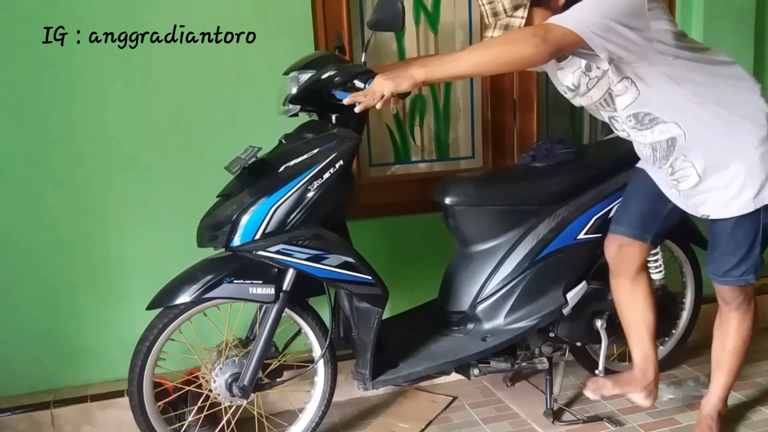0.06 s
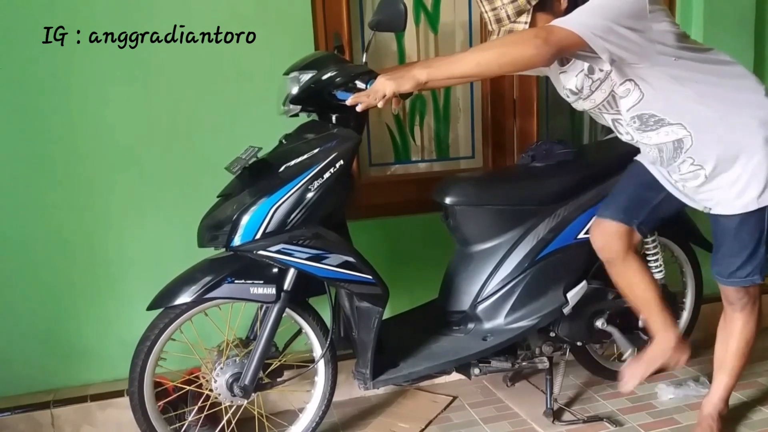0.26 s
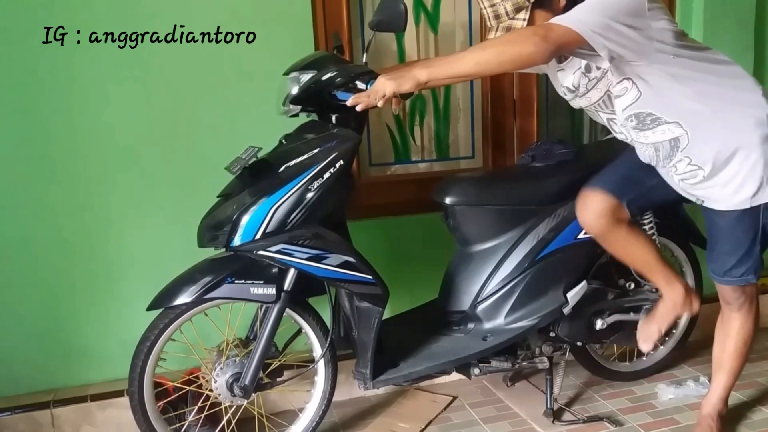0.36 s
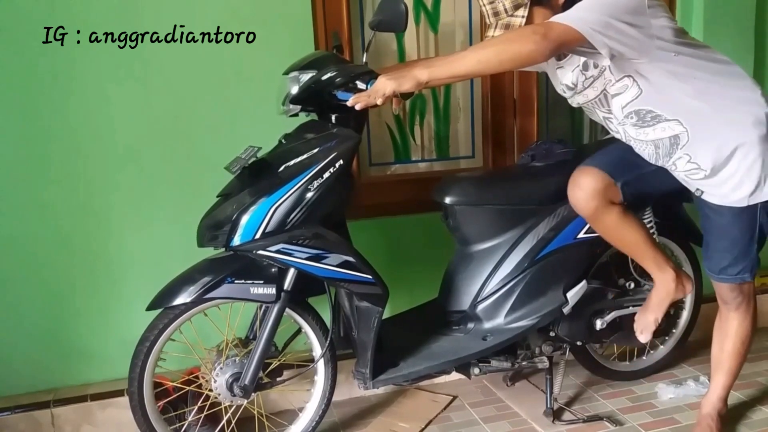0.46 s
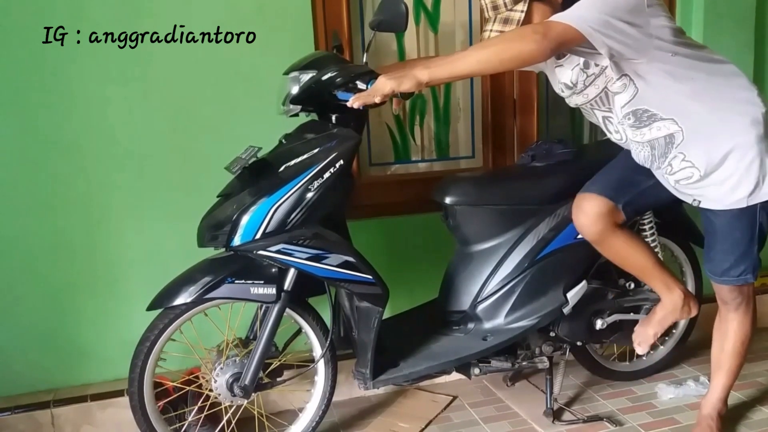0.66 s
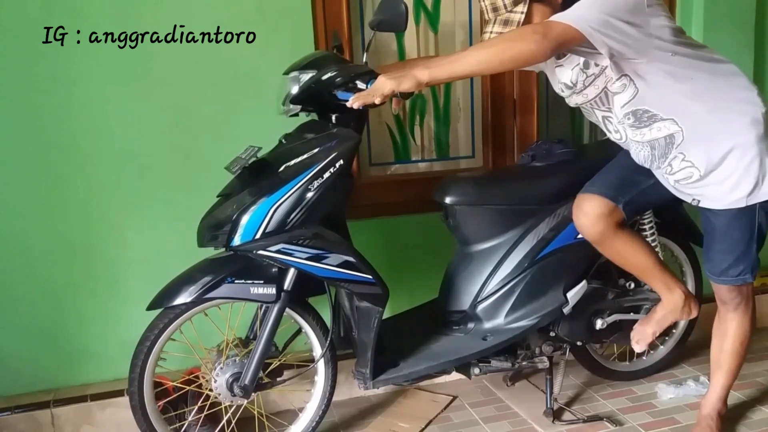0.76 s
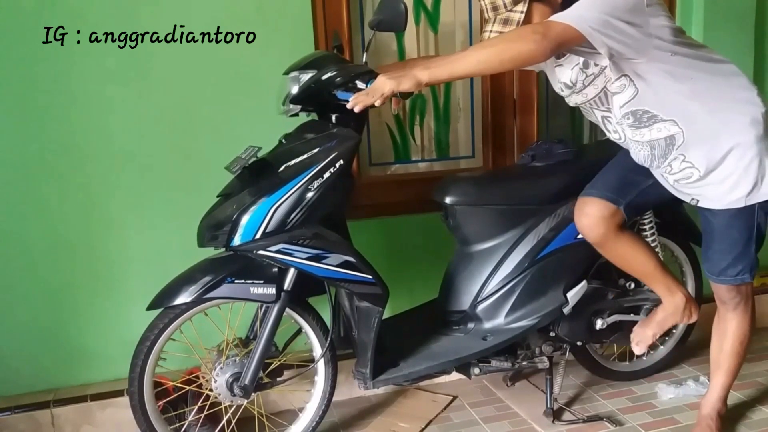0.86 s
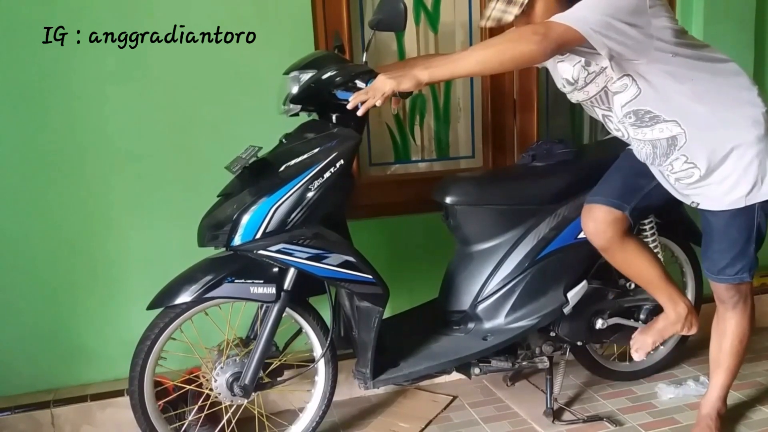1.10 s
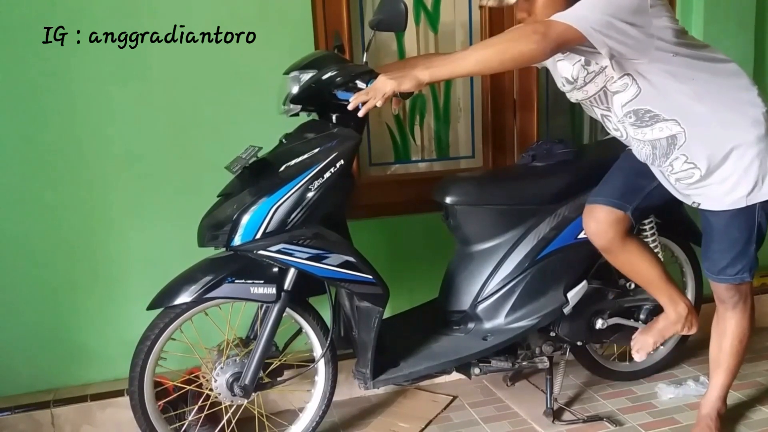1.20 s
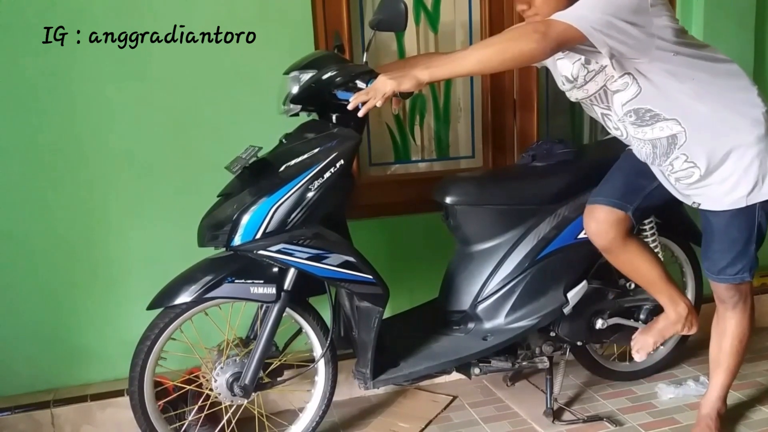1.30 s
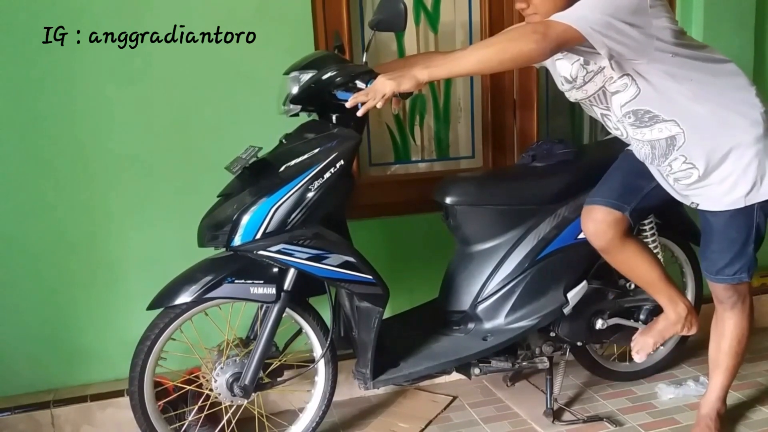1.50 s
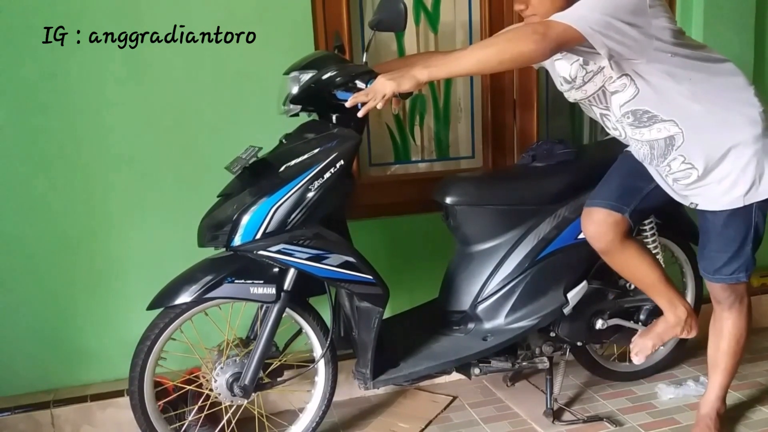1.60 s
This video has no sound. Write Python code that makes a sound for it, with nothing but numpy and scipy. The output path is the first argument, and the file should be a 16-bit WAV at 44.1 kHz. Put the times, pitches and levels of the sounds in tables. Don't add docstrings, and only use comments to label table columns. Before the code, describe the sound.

Kick-start lever clanks with low exhaust puffs and gear rattle, springs back, and settles without starting

```python
import sys
import numpy as np
from scipy import signal
from scipy.fft import rfft, irfft
from scipy.io import wavfile
from scipy.ndimage import uniform_filter1d

SR = 44100
rng = np.random.default_rng(int(sys.argv[2]) if len(sys.argv) > 2 else 0)


def to_wav(s):
    ch = np.atleast_2d(s).T
    pcm = np.round(np.clip(ch, -1, 1) * 32767)
    wavfile.write(sys.argv[1], SR, pcm.astype(np.int16))


def decibels_to_gain(level_db):
    exponent = np.asarray(level_db, float) / 20
    return 10 ** exponent


N = 72765
T = np.arange(N) / SR


def read(points, hz):
    f, value = np.transpose(points)
    return np.interp(np.log(hz + 1), np.log(f + 1), value)


def evened(x):
    return x / np.sqrt(np.mean(x ** 2) + 1e-20)


def add(mix, s, sound):
    part = mix[round(s * SR):][:len(sound)]
    part += sound[:len(part)]


def colour(x, points, tilt_db=0.):
    hz = np.abs(np.fft.fftfreq(4096, 1 / SR))
    gain_db = read(points, hz) + tilt_db * np.log2((hz + 100) / 2000)
    log_gain = np.log(decibels_to_gain(gain_db))
    taps = np.fft.ifft(np.exp(np.conj(signal.hilbert(log_gain)))).real[:2048]
    return signal.oaconvolve(x, taps / np.linalg.norm(taps))[:len(x)]


def level(curve):
    s, db = np.transpose(curve)
    return decibels_to_gain(np.interp(T, s, db, -120, -120))


def ring(hz, t60_s, rise_s, t):
    return (1 - np.exp(-t / rise_s)) * decibels_to_gain(-60 * t / t60_s) * np.sin(2 * np.pi * hz * t)


def clicks(per_s, spread_db):
    size = decibels_to_gain(spread_db * np.minimum(rng.exponential(1, N), 4)) * rng.choice([-1., 1.], N)
    return size * (rng.random(N) < per_s / SR)


def tooth_clicks():
    return clicks(2500, 3.8)


def knocks(rows, spectrum, snap_db=7, shiver_db=-9, rise_s=0.00006):
    # (frequency [Hz], level [dB], T60 [s])
    case_modes = [(1454, -6, .05), (1530, -2, .05), (1674, -4, .07), (2430, -10, .04), (2740, -7, .05),
                  (3402, -2, .025), (3709, -8, .04), (4350, -3, .02), (4662, -10, .04)]
    shiver_s, case_db = 0.017, -17
    out, t = np.zeros(N), np.arange(8192) / SR
    for s, db, tilt_db, ring_db, crack_s in rows:
        crack = rng.standard_normal(len(t)) * np.exp(-t / crack_s)
        shiver = decibels_to_gain(shiver_db) * rng.standard_normal(len(t)) * np.exp(-t / shiver_s)
        drive = (crack + shiver) * (1 - np.exp(-t / rise_s))
        drive[round(crack_s * SR / 3)] -= decibels_to_gain(snap_db)
        modes = np.zeros(len(t))
        for hz, mode_db, t60_s in case_modes:
            uneven_db = 2 * rng.standard_normal()
            mode_gain = decibels_to_gain(mode_db + uneven_db + tilt_db * np.log2(hz / 2000))
            modes += mode_gain * ring(hz, t60_s, rise_s, t)
        hit = colour(drive, spectrum, tilt_db) + decibels_to_gain(case_db + ring_db) * modes
        add(out, s, decibels_to_gain(db - 2.5) * hit)
    return out


def floor():
    # (frequency [Hz], level [dB])
    hum_hiss = [(30, -26), (60, 7), (90, 1.5), (185, 3.5), (260, -3.5), (800, -12), (3000, -27),
                (6500, -39.5), (15500, -40)]
    noise = rfft(rng.standard_normal(N)) * decibels_to_gain(read(hum_hiss, np.fft.rfftfreq(N, 1 / SR)))
    swell = evened(uniform_filter1d(rng.standard_normal(N), 3000))
    return decibels_to_gain(-61.5 + 2.5 * swell) * evened(irfft(noise, N))


def spring():
    # (time [s], frequency [Hz], level [dB], T60 [s])
    squeaks = [
        (.105, 3600, -79, 3.0),
        (.172, 3600, -60, .25),
        (1.155, 5010, -57.5, .9),
        (1.325, 4990, -71, .3),
        (1.42, 5000, -77, .25),
    ]
    out, t = np.zeros(N), T[:SR // 2]
    for s, hz, db, t60_s in squeaks:
        waver = decibels_to_gain(2.2 * evened(uniform_filter1d(rng.standard_normal(len(t)), 300)))
        add(out, s, decibels_to_gain(db) * waver * ring(hz, t60_s, .0015, t))
    return out


def sole():
    # (time [s], level [dB])
    scuff = [(.125, -81.5), (.15, -61), (.163, -52), (.176, -47), (.192, -48.5), (.225, -45.5), (.26, -41),
             (.3, -69.5)]
    # (frequency [Hz], level [dB])
    rubber = [(150, -27), (250, -5), (490, -9), (1330, -10.5), (1730, -12.5), (3010, -16.5), (3570, -14),
              (15500, -59)]
    split_hz, lag_s = 2500, 0.016
    rub = evened(colour(clicks(12000, 1.7), rubber))
    dull = signal.sosfilt(signal.butter(2, split_hz, fs=SR, output="sos"), rub)
    bright = rub - dull
    swell = level(scuff)
    return dull * swell + bright * np.roll(swell, round(lag_s * SR))


def frame_shudder():
    # (time [s], level [dB])
    shake = [(.2, -57), (.27, -45.5), (.4, -46.5), (.6, -50), (.79, -54.5), (.82, -54), (.85, -52),
             (.87, -44), (.97, -49), (1.03, -59.5), (1.28, -65), (1.31, -62), (1.4, -57)]
    # (frequency [Hz], level [dB])
    tubes = [(50, -24), (90, 5), (140, 3), (220, -3.5), (310, 4), (420, -9.5), (700, -38), (2000, -86.5)]
    return evened(colour(clicks(1500, 2.7), tubes)) * level(shake)


def exhaust():
    # (time [s], level [dB], pitch [Hz], T60 [s], valve open [s])
    puffs = [(0.2064, -19, 98.6, 1.1, .023), (0.241, -21.5, 113.2, 0.27, 0.056),
             (0.2953, -21.5, 115.6, 0.25, 0.071), (0.39, -34.5, 107, 0.3, 0.05),
             (0.267, -35.5, 178.5, 0.36, .05), (.385, -37.5, 182, .2, .025),
             (0.462, -32.5, 112, 0.094, 0.017), (0.493, -28.5, 93.5, 0.081, 0.11),
             (0.861, -43.5, 133.5, 0.18, 0.032), (0.937, -37, 152, 0.16, .07),
             (1.289, -58.5, 112, 0.5, .05)]
    # (pitch ratio [-], level [dB])
    overtones = [(1.6, -16), (2.7, -34)]
    rise_s, shut_s = 0.0019, 0.0024
    out, t = np.zeros(N), np.arange(SR // 2) / SR
    for s, db, hz, t60_s, open_s in puffs:
        tone = ring(hz, t60_s, rise_s, t)
        for ratio, overtone_db in overtones:
            tone += decibels_to_gain(overtone_db) * ring(ratio * hz, t60_s, rise_s, t)
        choke = np.exp(-np.maximum(t - open_s, 0) / shut_s)
        add(out, s, -decibels_to_gain(db) * tone * choke)
    return out


def pawl_ticks():
    # (time [s], level [dB], tilt [dB/octave], ring share [dB], crack [s])
    ticks = [
        (.2305, -47, 1, -42, .003),
        (.779, -56, 3, -57, .003),
        (1.157, -56, -10, -40, 0.014),
    ]
    # (frequency [Hz], level [dB])
    pawl = [(1000, -22.5), (4000, -11.5), (6500, 6), (10000, -21.5), (12000, -12.5), (14300, -12)]
    return knocks(ticks, pawl)


def gear_engaging():
    # (time [s], level [dB], tilt [dB/octave], ring share [dB], crack [s])
    clanks = [
        (.2662, -11, 1, -24, 0.0024),
        (.312, -24, 6.5, -25.5, 0.0049),
        (.346, -17, 0, -26, 0.0043),
        (.393, -25, -6.5, -1, 0.003),
        (.453, -23.5, -1, 8, 0.00386),
    ]
    # (frequency [Hz], level [dB])
    mesh = [(300, -25), (1000, -11), (1510, -1), (2100, -15), (3400, -5), (4600, -6), (5700, -22),
            (6800, -18), (8200, -30), (15000, -46)]
    return knocks(clanks, mesh)


def tinks():
    # (time [s], level [dB], frequency [Hz], T60 [s])
    parts = [(.2665, -20, 3400, .02), (.2665, -22, 4400, .02), (.2665, -30, 6700, .02),
             (.269, -18, 1520, .04), (.374, -23, 2700, .06), (.392, -19, 1400, .04),
             (.808, -31, 3500, .025), (.808, -36, 6700, .025), (.84, -30, 1500, .05),
             (.8495, -27, 3500, .02), (.8495, -44, 10800, .015), (1.217, -40, 700, .06),
             (1.23, -41, 950, .06), (1.285, -40, 1450, .06), (1.398, -50, 1500, .03)]
    out, t = np.zeros(N), T[:8192]
    for s, db, hz, t60_s in parts:
        add(out, s, decibels_to_gain(db) * ring(hz, t60_s, .0006, t))
    return out


def gear_rattle():
    # (time [s], level [dB])
    rattle = [(.268, -28.5), (.29, -34), (.335, -31.5), (.36, -31.5), (.4, -31), (.44, -50), (.55, -41.5),
              (.66, -56.5), (.76, -54)]
    # (frequency [Hz], level [dB])
    gear_spectrum = [(120, -30), (200, -15.5), (497, -14.5), (798, -2.5), (1650, -2), (2170, -1.5),
                     (2700, 2), (4700, -10), (5700, -13), (6800, -19), (15500, -64.5)]
    # (frequency [Hz], width [Hz], level [dB])
    peaks = [(1248, 39, 9), (1948, 120, -24), (2760, 120, -13), (3880, 15, 3), (4440, 64, 5)]
    t, teeth = np.arange(2048) / SR, tooth_clicks()
    body = np.zeros(len(t))
    for hz, width_hz, db in peaks:
        body += decibels_to_gain(db) * np.exp(-np.pi * width_hz * t) * np.sin(2 * np.pi * hz * t)
    resonant = evened(signal.oaconvolve(teeth, body)[:N])
    sound = evened(colour(teeth, gear_spectrum)) + decibels_to_gain(-17.0) * resonant
    return evened(sound) * level(rattle)


def frame_thumps():
    # (time [s], level [dB], frequency [Hz])
    thumps = [
        (0.337, -38, 328),
        (0.455, -38.5, 315),
        (0.531, -40, 324),
        (0.853, -38, 299.6),
        (0.929, -39, 294.6),
        (1.302, -44, 319),
    ]
    out, t = np.zeros(N), np.arange(SR // 2) / SR
    for s, db, hz in thumps:
        add(out, s, decibels_to_gain(db) * ring(hz, 0.12, 0.008, t))
    return out


def settling_clunks():
    # (time [s], level [dB], tilt [dB/octave], ring share [dB], crack [s])
    clunks = [
        (.651, -31.5, -1.3, -16.5, 0.022),
        (1.2072, -30, 0.97, -1.5, 0.0064),
        (1.229, -50, -0.55, -16, 0.0054),
        (1.286, -50, 0.29, -5, 0.0031),
        (1.398, -66, -0.86, 1, 0.0045),
    ]
    # (frequency [Hz], level [dB])
    dull_metal = [(300, -14.5), (650, -4), (1000, -0.5), (1500, -1), (2300, -4), (4100, -7.5), (4700, -23),
                  (6200, -25), (15000, -84)]
    return knocks(clunks, dull_metal, snap_db=-13, shiver_db=-17.5, rise_s=.004)


def lever_stop():
    # (time [s], level [dB], tilt [dB/octave], ring share [dB], crack [s])
    stops = [
        (.8072, -22, 0, -3, 0.00253),
    ]
    # (frequency [Hz], level [dB])
    stop_spectrum = [(300, -13), (800, -5), (1500, 1), (2300, -17.5), (3500, -9.5), (5200, -11.5),
                     (5900, -16.5), (6800, -18.5), (8400, -40), (15000, -50)]
    return knocks(stops, stop_spectrum, snap_db=-1)


def lever_rattle():
    # (time [s], level [dB])
    way_back = [(.808, -87), (.83, -39.5), (.88, -47.5), (.95, -59.5), (1.05, -65), (1.21, -61),
                (1.25, -57), (1.36, -71.5), (1.45, -93)]
    # (frequency [Hz], level [dB])
    lever_spectrum = [(250, -9.5), (700, 4), (1500, 1), (2300, -3), (5100, -2), (6000, -29), (8400, -42.5),
                      (15500, -54)]
    return evened(colour(tooth_clicks(), lever_spectrum)) * level(way_back)


def lever_bounce():
    # (time [s], level [dB], tilt [dB/octave], ring share [dB], crack [s])
    bounces = [
        (.8492, -21.5, 0, -10, .0015),
    ]
    # (frequency [Hz], level [dB])
    rebound = [(300, -12), (1000, -2), (3500, 3), (7500, -18), (8400, -20), (9500, -27.5), (11500, -27.5),
               (15000, -43)]
    return knocks(bounces, rebound, snap_db=15, shiver_db=-15.5)


def tail():
    # (frequency [Hz], T60 [s])
    tiles = [(60, .5), (130, 0.23), (300, 0.76), (700, 0.91), (1800, 0.82), (4800, 0.77), (8000, 0.65),
             (14000, 0.55)]
    gap_s, spacing = 0.004, 12
    taps = np.zeros(SR * 3 // 2)
    at = np.arange(round(gap_s * SR), len(taps) - spacing, spacing)
    taps[at + rng.integers(0, spacing, len(at))] = rng.choice([-1., 1.], len(at))
    hz, t, z = signal.stft(taps, SR, nperseg=256)
    decay = decibels_to_gain(-60 * t / read(tiles, hz)[:, None])
    out = signal.istft(z * decay, SR, nperseg=256)[1]
    return out / np.linalg.norm(out)


def room(x):
    out = np.zeros(N)
    for k in range(3):
        feed = np.sqrt(2 / 3) * np.cos(2 * np.pi * (1.27 * T + k / 6))
        out += signal.fftconvolve(x * feed, tail())[:N]
    return out


def scene():
    hits = pawl_ticks() + gear_engaging() + settling_clunks() + lever_stop() + lever_bounce()
    metal = hits + sole() + gear_rattle() + lever_rattle()
    low = frame_shudder() + exhaust() + frame_thumps()
    squeak, tink = spring(), tinks()
    direct = metal + low + squeak + tink
    to_room = decibels_to_gain(2) * metal + decibels_to_gain(-15) * low + decibels_to_gain(-9) * tink + squeak / 10
    return (direct + room(to_room) + floor())[None]


def band_limit(x):
    return signal.sosfilt(signal.butter(12, 16080, fs=SR, output="sos"), x)


def record(dry):
    low_cut = signal.butter(2, 51, "high", fs=SR, output="sos")
    top_cut = signal.firwin(511, 15650, fs=SR)[None]
    mix = signal.sosfiltfilt(low_cut, dry)
    mix = signal.oaconvolve(mix, top_cut, "same")
    return band_limit(mix)


dry = scene()
out = record(dry)
to_wav(out)
```